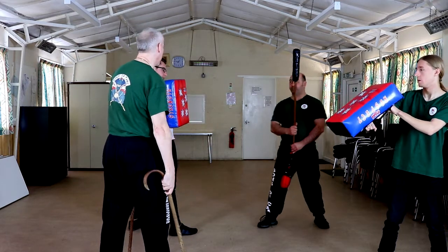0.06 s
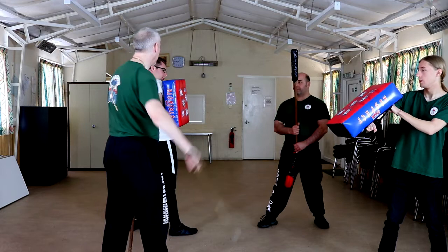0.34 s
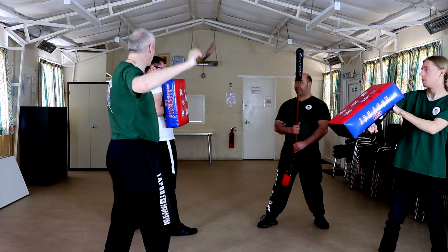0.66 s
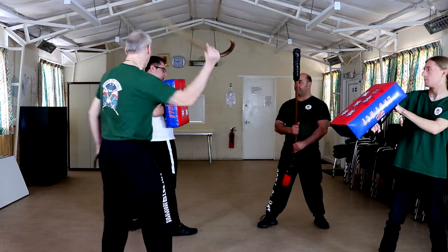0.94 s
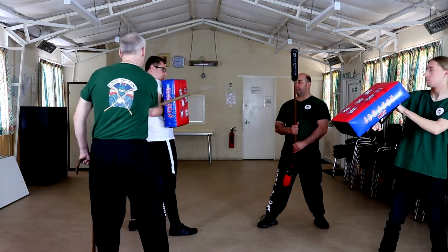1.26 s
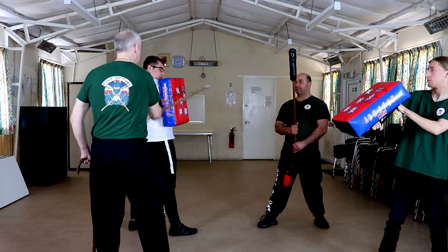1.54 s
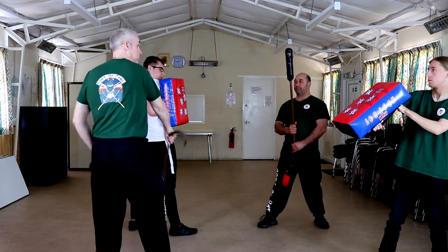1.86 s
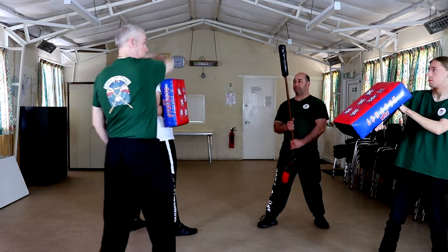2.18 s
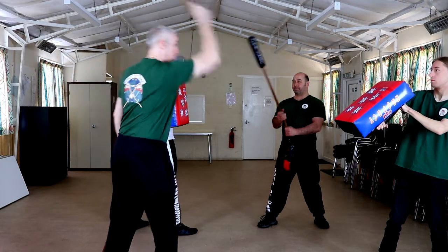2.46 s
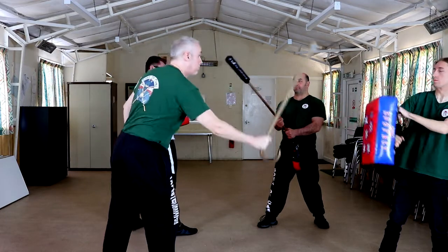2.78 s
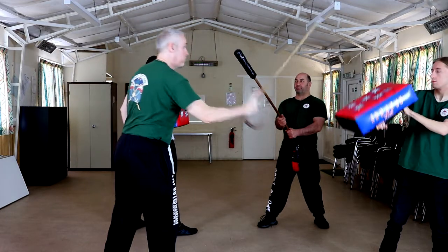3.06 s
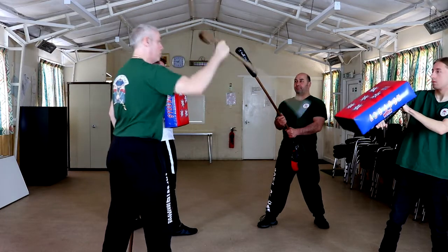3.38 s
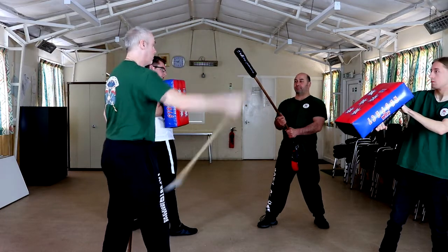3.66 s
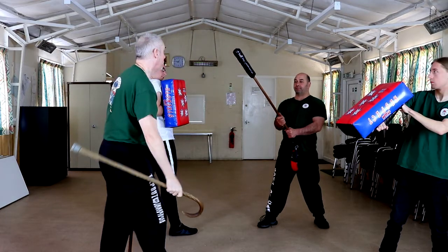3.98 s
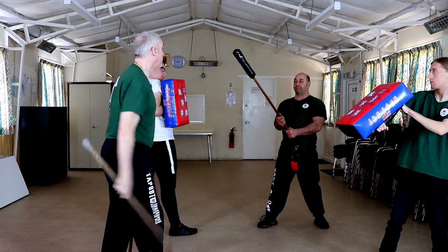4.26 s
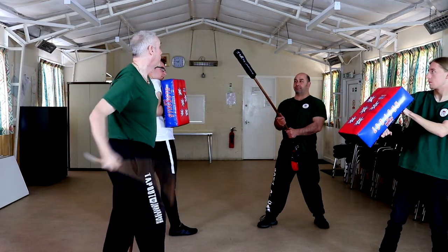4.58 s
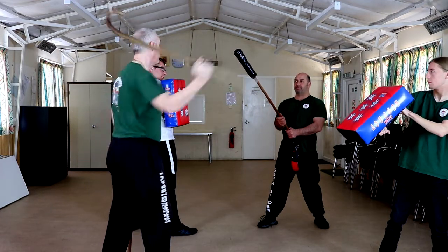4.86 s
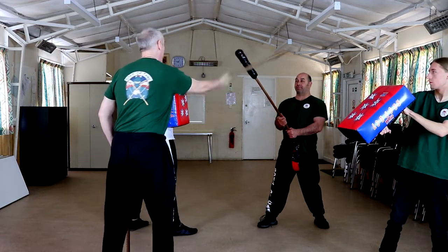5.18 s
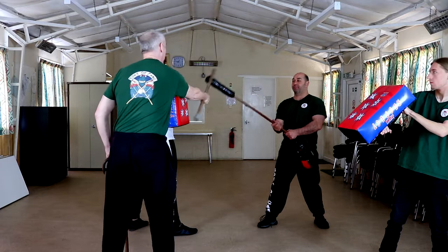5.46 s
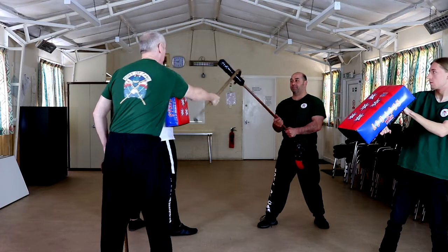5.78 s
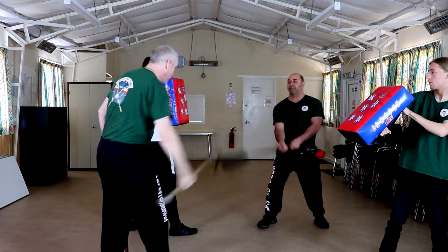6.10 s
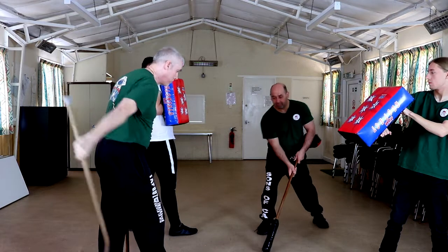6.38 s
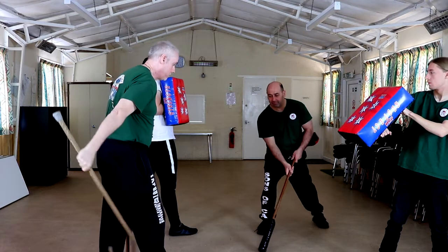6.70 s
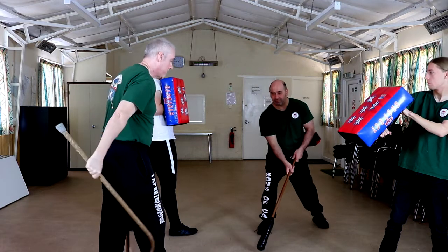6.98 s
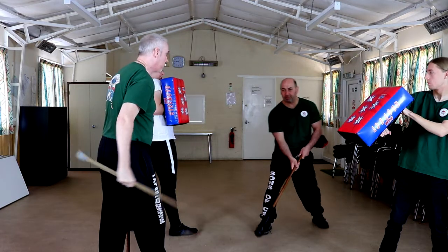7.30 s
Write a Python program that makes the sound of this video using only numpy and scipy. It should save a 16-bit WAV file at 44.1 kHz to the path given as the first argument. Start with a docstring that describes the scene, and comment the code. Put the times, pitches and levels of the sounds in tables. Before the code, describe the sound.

A large, bare hall is quiet, with faint hiss and a distant traffic drone. Small cane clicks come just before a very loud, full smack on a foam shield at about 1.3 seconds. A second, deeper smack hits another shield at 2.7 seconds. Both overload the microphone and ring off the walls for under a second. Clothes rustle faintly between blows, and a shoe shifts softly near 4.4 seconds. At 5.3 seconds the cane strikes a padded baton with a sharper, brighter crack that leaves a thin ring. After a light tick, the cane rubs along the baton's cover in two soft, hissing slides around 5.9 and 6.1 seconds. The baton knocks on the floor at 6.3 seconds and bounces once, quieter than the strikes. The hall then settles, with a slight sleeve rustle near 7.4 seconds.

```python
"""Cane strikes in a bare training hall.

A wooden cane smacks two vinyl-covered foam shields, then a padded baton. Its crook slides along
the baton and drags it down to knock on the floor; clothes swish between blows, traffic drones far off.
Each smack overloads the camera, whose gain control then holds the hall's ring level for a moment."""
import sys
import numpy as np
from scipy import signal
from scipy.fft import rfft, irfft, next_fast_len
from scipy.io import wavfile
from scipy.ndimage import uniform_filter1d

SR = 44100
rng = np.random.default_rng(int(sys.argv[2]) if len(sys.argv) > 2 else 0)


def persist_wave(psi):
    """Save psi, clipped to +-1, as 16-bit WAV."""
    counts = np.round(np.clip(psi, -1, 1) * 32767).astype(np.int16)
    wavfile.write(sys.argv[1], SR, np.atleast_2d(counts).T)


N = 328116

# cane on upright shield, tilted shield, baton: start_s, level_db, crack_t60_s, direct_db, push_db
STRIKES = [(1.251, 36, 0.01, -3.5, -2.5), (2.6900, 32, 0.019, -4.5, 7), (5.2588, 21, 0.0063, -2, -3)]
# baton tip on the floor: start_s, level_db, crack_t60_s, thump_db
KNOCKS = [(6.2735, -3, 0.014, 6.5), (6.3755, -9, 0.01, 11)]


def strikes():
    """The cane lands on each pad in turn; foam and cover colour the smack."""
    # pad spectra: freq_hz, gain_db
    upright_shield = [(30, -1.5), (70, -4.5), (100, -5), (150, 4), (220, 2.5), (330, 1.5), (500, -5.5),
                      (900, 0), (1600, -6), (2700, -11), (5000, -14.5), (8500, -14), (11000, -21.5),
                      (16000, -30.5)]
    tilted_shield = [(30, -11), (70, -10.5), (150, 2.5), (290, 1.5), (430, -4), (700, -1.5), (1100, -2),
                     (1800, -12), (3200, -11), (6000, -16.5), (8300, -11.5), (11000, -19), (16000, -26)]
    baton = [(30, -9), (70, -18), (130, -10.5), (190, -6.5), (290, -4.5), (550, -4), (950, 2), (1700, 2.5),
             (2600, 4.5), (4600, -1.5), (6500, -9.5), (8500, -15.5), (10500, -30), (16000, -30)]
    pads = (upright_shield, tilted_shield, baton)
    track = np.zeros(N)
    for (start_s, level_db, t60_s, direct_db, push_db), pad in zip(STRIKES, pads):
        add(track, start_s, amp(level_db) * impact(spectrum(pad), t60_s, push_db, direct_db))
    return track


def crack(t60_s, push_db, split_hz=600):
    """Contact: one smooth bass push from the core, a brief surface crackle above it."""
    t = np.arange(SR // 10) / SR
    burst = rng.standard_normal(len(t)) * amp(-60 * t / t60_s) * (1 - np.exp(-t / .0008))
    burst /= np.linalg.norm(burst)
    crackle = signal.lfilter(*signal.butter(2, split_hz, "high", fs=SR), burst)
    push = signal.lfilter(*signal.butter(2, split_hz, fs=SR), signal.unit_impulse(len(t)))
    return amp(push_db) * push + crackle


def impact(colour, t60_s, push_db, direct_db):
    """A hit across the hall: direct path and reflections, each with its own crackle, then the tail."""
    # reflections off near surfaces: delay_s, gain_db
    walls = [(.0064, -5.5), (0.0141, -11.5), (.024, -13.5), (.0325, -16), (0.0423, -15)]
    paths = hall()
    add(paths, 0, amp(direct_db) * crack(t60_s, push_db))
    for delay_s, gain_db in walls:
        add(paths, delay_s + rng.normal(0, .0002), amp(gain_db) * crack(.49 * t60_s, push_db))
    return signal.fftconvolve(paths, minimum_phase(colour))


def clash_ring(pitch_hz=977, level_db=-31, t60_s=.86):
    """The last strike, stick on stick, leaves a thin ring."""
    t = np.maximum(np.arange(N) / SR - STRIKES[-1][0], 0)
    return amp(level_db - 60 * t / t60_s) * np.sin(2 * np.pi * pitch_hz * t)


def knocks(thump_hz=165):
    """The baton lands and bounces; a flatter landing has more floor thump."""
    # floor spectrum: freq_hz, gain_db
    flooring = [(40, -17), (120, -11), (200, 0.5), (290, -5.5), (480, 4.5), (680, 9.5), (900, -1.5),
                (1400, 3.5), (2100, 3), (3400, -1.5), (5000, -22), (8500, -19), (11000, -47),
                (16000, -41.5)]
    track = np.zeros(N)
    for start_s, level_db, t60_s, thump_db in KNOCKS:
        colour = lambda hz: amp(log_interp(flooring, hz) + thump_db * bell(hz, thump_hz, .64))
        add(track, start_s, amp(level_db) * impact(colour, t60_s, push_db=1, direct_db=2))
    return track


def padding(squash_lead_s=.016, rise_s=.0085, fall_s=.012, slap_lead_s=.0105):
    """The baton's foam squashes and its cover slaps the floor just before the core knocks."""
    squashes = [(s - squash_lead_s, db - 39.5, rise_s, fall_s) for s, db, *_ in KNOCKS]
    track = swishes(squashes, band(450, octaves=1.4), grain_db=3.5, direct_db=-1.5)
    for start_s, level_db, *_ in KNOCKS:
        add(track, start_s - slap_lead_s, amp(level_db - 5) * click(t60_s=.013, centre_hz=4500))
    return track


def slides(fall_s=.057, hiss_db=-10.5, hiss_share=.54):
    """The crook rubs along the baton's cover, hissing brighter where it moves fastest."""
    # crook strokes: peak_s, level_db, rise_s
    pulls = [(5.881, -53.5, 0.021), (6.132, -44, 0.048)]
    # cover friction spectrum: freq_hz, gain_db
    cover = [(88, -52), (150, -17), (296, -8.5), (561, -4.5), (1450, -2), (2230, -5), (8830, -10),
             (15500, -30)]
    strokes = [(s, db, rise_s, fall_s) for s, db, rise_s in pulls]
    fastest = [(s, db + hiss_db, rise_s * hiss_share, fall_s * hiss_share) for s, db, rise_s in pulls]
    rub = swishes(strokes, spectrum(cover), grain_db=1.5, direct_db=-1)
    hiss = swishes(fastest, band(8500, octaves=1), grain_db=-1, direct_db=1)
    return rub + hiss


def ticks():
    """The cane clicks as it shifts in the hand and catches on the baton."""
    # cane contacts: start_s, level_db, centre_hz
    contacts = [(.979, -35, 6870), (1.111, -32, 5200), (1.119, -24, 2353), (2.602, -32, 6330),
                (2.618, -33, 4800), (5.588, -31, 8000)]
    track = np.zeros(N)
    for start_s, level_db, centre_hz in contacts:
        add(track, start_s, amp(level_db) * click(t60_s=.018, centre_hz=centre_hz))
    return track


def click(t60_s, centre_hz, cutoff_hz=11000):
    """A small contact with one broad resonance."""
    colour = lambda hz: bell(hz, centre_hz, .61) + .015 / (1 + (hz / cutoff_hz) ** 4)
    return amp(-3) * impact(colour, t60_s, push_db=0, direct_db=3)


def swings(full_strike_db=36, db_per_db=.7):
    """strike_s, effort_db per swing: a harder strike moves more air and cloth."""
    return [(s, db_per_db * (db - full_strike_db)) for s, db, *_ in STRIKES]


def whooshes(level_db=-53, lead_s=.0075, rise_s=.052, fall_s=.009):
    """Air pushed ahead of the cane, cut short as it lands."""
    strokes = [(s - lead_s, level_db + effort_db, rise_s, fall_s) for s, effort_db in swings()]
    return swishes(strokes, band(200, octaves=1.15), grain_db=3.5, direct_db=-6)


def clothes(swing_db=-64.5, lead_s=.036, rise_s=.058):
    """Dull sleeve rustle with and between swings; brighter brushes of cane and hand over cloth."""
    # arm lifts and backswings: peak_s, level_db, rise_s
    sleeves = [(.05, -70.5, 0.18), (1.02, -71, 0.031), (2.45, -64.5, 0.058), (3.43, -63.5, 0.034),
               (7.41, -61.5, .022)]
    # brushes over cloth: peak_s, level_db, rise_s
    brushes = [(.32, -73.5, 0.26), (4.2, -64.5, 0.068), (4.345, -59, 0.027), (4.73, -73.5, .025),
               (5.67, -60.5, .03)]
    swinging = [(s - lead_s, swing_db + effort_db, rise_s) for s, effort_db in swings()]
    rustle = rubs(sleeves + swinging, band(1590, octaves=1.45))
    return rustle + rubs(brushes, band(5740, octaves=.85))


def scuffs():
    """A shoe shifts on the floor."""
    # sole movements: peak_s, level_db, rise_s
    shifts = [(.43, -66, 0.086), (4.43, -64.5, 0.033)]
    return rubs(shifts, band(1400, octaves=.87))


def rubs(moves, colour, fall_per_rise=1.1):
    """Cloth or sole friction: a limb moves, then settles slightly slower."""
    strokes = [(s, db, rise_s, rise_s * fall_per_rise) for s, db, rise_s in moves]
    return swishes(strokes, colour, grain_db=2.5, direct_db=-1.5)


def swishes(strokes, colour, grain_db, direct_db):
    """Noise swells in the hall, roughened by tiny catches of the surfaces."""
    t = np.arange(N) / SR
    swell = np.zeros(N)
    for peak_s, level_db, rise_s, fall_s in strokes:
        from_peak = 1.4 * (t - peak_s) / np.where(t < peak_s, rise_s, fall_s)
        swell += amp(level_db) / np.cosh(np.clip(from_peak, -20, 20))
    smooth = swell * noise(colour)
    catches = unit_rms(uniform_filter1d(rng.standard_normal(N), size=90))
    rough = smooth * unit_rms(amp(grain_db * catches))
    return amp(direct_db) * rough + amp(-8.5) * signal.fftconvolve(rough, hall())[:N]


def hall(build_s=.006):
    """Late impulse response: diffuse tail plus standing waves."""
    # tail decay: freq_hz, t60_s
    decay = [(60, 1.0), (160, 0.3426), (420, 0.635), (950, 0.6946), (1600, 0.6338), (3000, 0.6515),
             (5000, 0.5648), (8000, 0.4629), (14000, 0.3761)]
    # tail spectrum: freq_hz, gain_db
    colour = [(30, -18), (95, -18), (135, -1), (180, -4), (280, 4), (1000, -1), (4000, -0.5), (9000, -3.5),
              (16000, -11)]
    # standing waves: freq_hz, level_db, t60_s
    modes = [(63, -61.5, 1.1), (119, -46.5, 0.78), (135.3, -50.5, .55), (295.2, -51, .62),
             (346.6, -54.5, 0.83), (459, -54.5, .88), (505, -60, 0.97), (820, -60.5, 0.47)]
    t = np.arange(SR * 3 // 2) / SR
    hz, frame_s, bins = signal.stft(rng.standard_normal(len(t)), SR, nperseg=512)
    fade_db = log_interp(colour, hz)[:, None] - 60 * frame_s / log_interp(decay, hz)[:, None]
    tail = signal.istft(bins * amp(fade_db), SR, nperseg=512)[1][:len(t)]
    waves = sum(amp(level_db - 60 * t / t60_s) * np.sin(2 * np.pi * (freq_hz * t + rng.random()))
                for freq_hz, level_db, t60_s in modes)
    return (amp(-26) * tail + waves) * (1 - np.exp(-t / build_s))


def background(drone_hz=101.5, waver_hz=1.3):
    """Still air and hiss; a wavering drone of distant traffic comes and goes."""
    # room noise spectrum: freq_hz, gain_db
    air = [(15, -35.5), (25, -3), (102, -4.5), (133, -4), (255, -5), (291, -4), (361, -6.5), (637, -8),
           (691, -6.5), (791, -6), (1390, -11), (1980, -13.5), (15800, -19.5)]
    # traffic envelope: time_s, level_db
    traffic = [(0, -85), (.5, -71.5), (1.2, -77.5), (2.2, -88.5), (3.9, -87.5), (4.4, -79.5), (7.4, -96)]
    waver = noise(lambda hz: 1 / (1 + (hz / 3) ** 4))
    drone = unit_rms(np.sin(2 * np.pi * np.cumsum(drone_hz + waver_hz * waver) / SR))
    drone_db = np.interp(np.arange(N) / SR, *np.transpose(traffic))
    return amp(-67.5) * noise(spectrum(air)) + amp(drone_db) * drone


def amp(db):
    return 10 ** (np.asarray(db) / 20)


def unit_rms(x):
    return x / np.sqrt(np.mean(x ** 2) + 1e-20)


def log_interp(points, hz):
    """Interpolate freq_hz, value rows on a log-frequency axis."""
    freq_hz, values = np.transpose(points)
    return np.interp(np.log(hz + 1), np.log(freq_hz + 1), values)


def spectrum(points):
    """Gain curve through freq_hz, gain_db rows."""
    return lambda hz: amp(log_interp(points, hz))


def bell(hz, centre_hz, octaves):
    """Gaussian of height 1 in log frequency."""
    return np.exp(-.5 * (np.log2((hz + 1) / centre_hz) / octaves) ** 2)


def band(centre_hz, octaves, cutoff_hz=13000):
    """Gain curve: one broad hump, top rolled off."""
    return lambda hz: bell(hz, centre_hz, octaves) / (1 + (hz / cutoff_hz) ** 6)


def noise(colour):
    """Unit-rms noise shaped by a gain curve."""
    size = next_fast_len(N + 8192)
    bins = rfft(rng.standard_normal(N), size) * colour(np.fft.rfftfreq(size, 1 / SR))
    return unit_rms(irfft(bins, size)[:N])


def minimum_phase(colour, size=4096):
    """Causal impulse response of a gain curve."""
    gain = np.maximum(colour(np.fft.rfftfreq(size, 1 / SR)), 1e-6)
    cepstrum = irfft(np.log(gain))
    cepstrum[1:size // 2] *= 2
    cepstrum[size // 2 + 1:] = 0
    return irfft(np.exp(rfft(cepstrum)))


def add(track, start_s, sound):
    part = track[max(0, round(start_s * SR)):][:len(sound)]
    part += sound[:len(part)]


def lag(x, tau_s):
    """One-pole follower."""
    pole = np.exp(-1 / (tau_s * SR))
    return signal.lfilter([1 - pole], [1, -pole], x)


def gain_control(x, limit_db, window_s, lag_s):
    """Turns down level above the limit, too slowly to catch the first milliseconds."""
    level_db = 10 * np.log10(lag(x ** 2, window_s) + 1e-12)
    excess_db = np.maximum(level_db - limit_db, 0)
    return x * amp(-lag(excess_db, lag_s))


def scene():
    """Three strikes, the baton dragged to the floor, movement and background; mono."""
    blows = strikes() + clash_ring() + knocks() + padding()
    movement = whooshes() + clothes() + scuffs() + slides() + ticks()
    return (blows + movement + background())[None]


def record(dry, low_hz=18, top_hz=15900):
    """Camera: bass cut, gain control, overload clipping, band limit."""
    bass_cut = signal.butter(2, low_hz, "high", fs=SR, output="sos")
    band_limit = signal.ellip(10, .1, 70, top_hz, fs=SR, output="sos")
    heard = signal.sosfilt(bass_cut, dry[0])
    held = gain_control(heard, limit_db=-23, window_s=.021, lag_s=.0059)
    clipped = np.clip(held, -.52, .52)
    return signal.sosfilt(band_limit, clipped)[None]


dry = scene()
out = record(dry)
persist_wave(out)
```